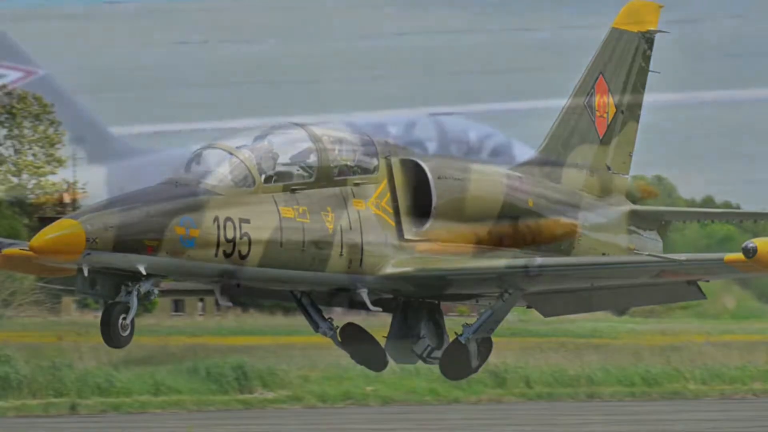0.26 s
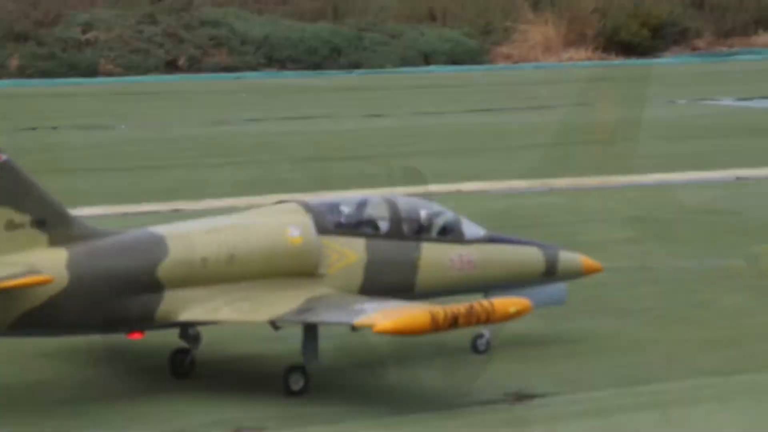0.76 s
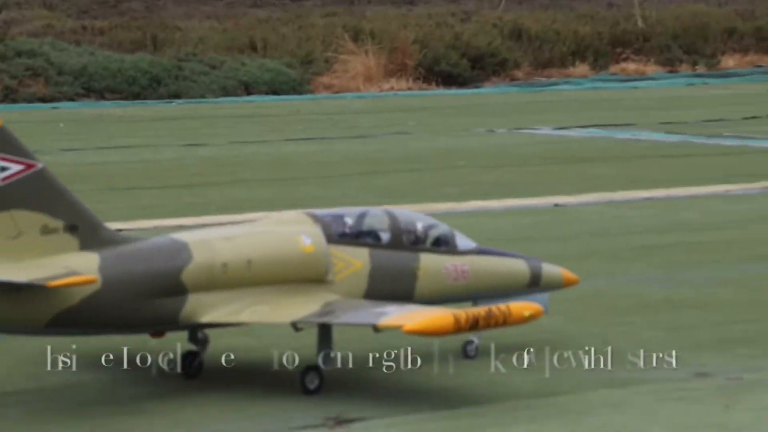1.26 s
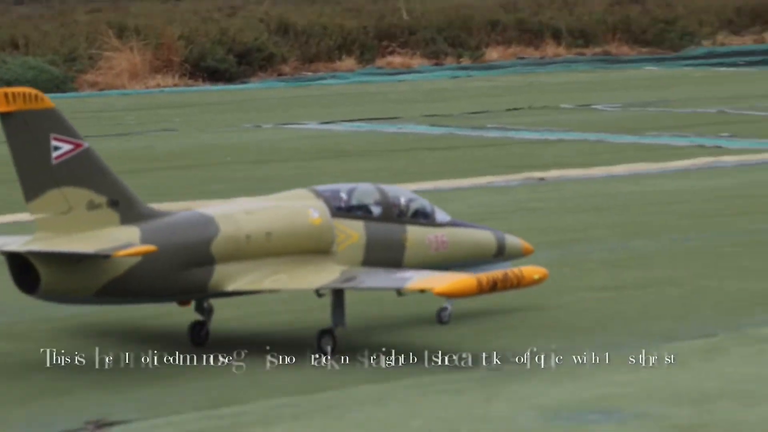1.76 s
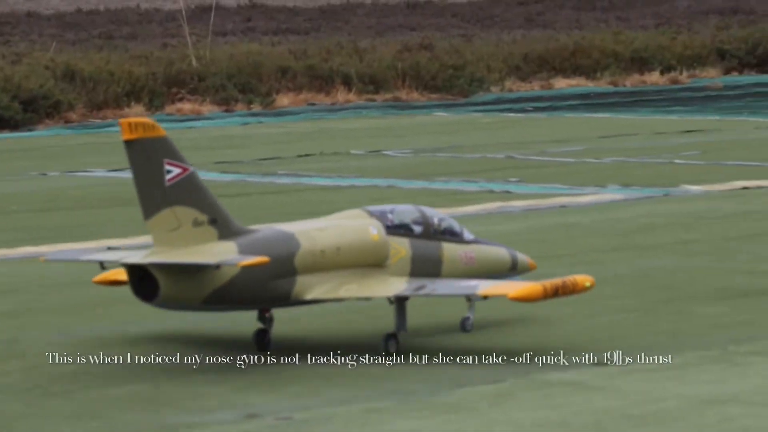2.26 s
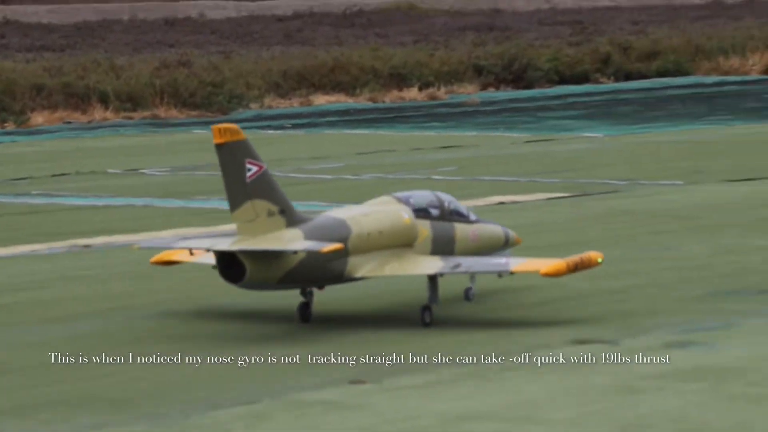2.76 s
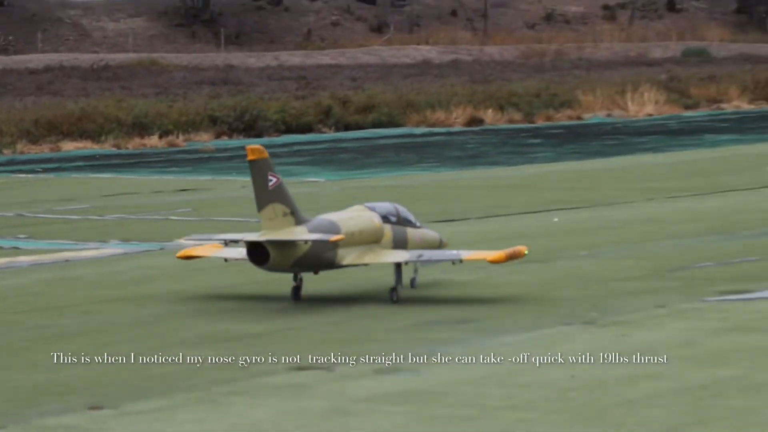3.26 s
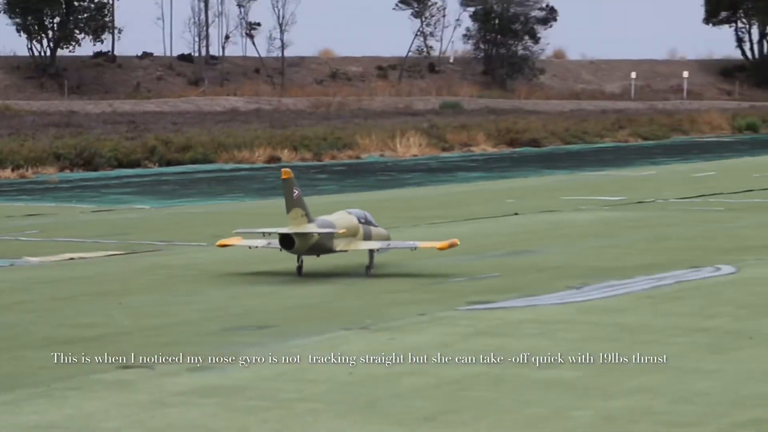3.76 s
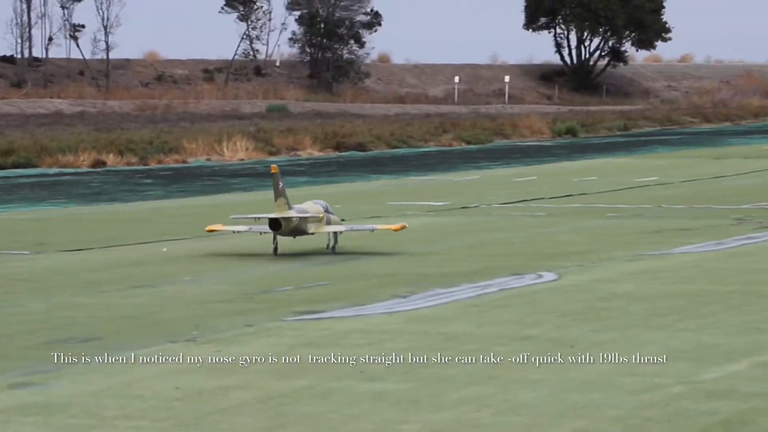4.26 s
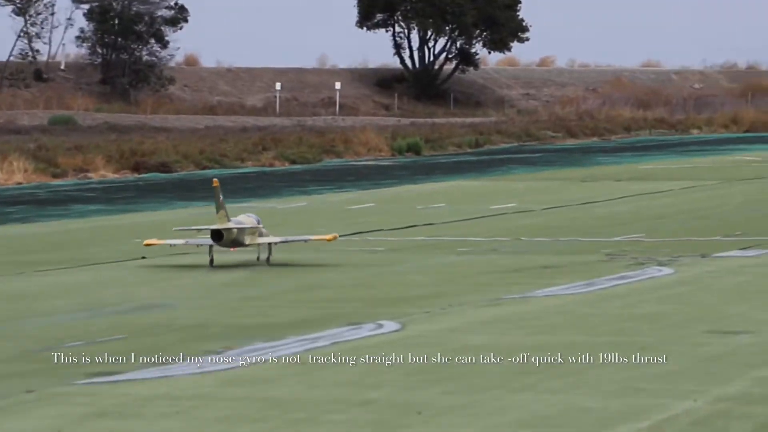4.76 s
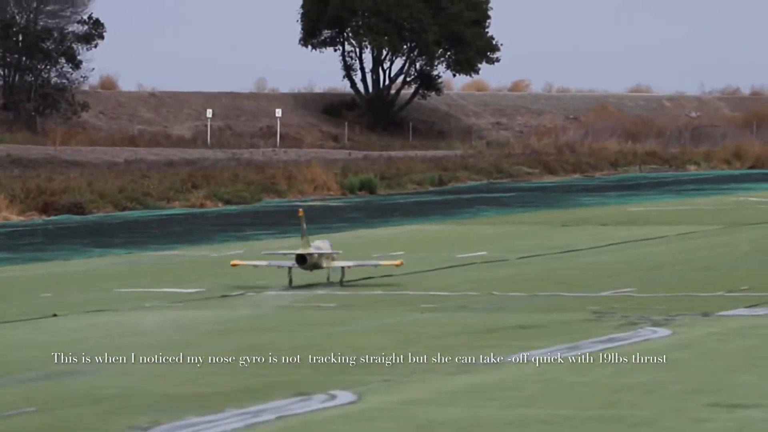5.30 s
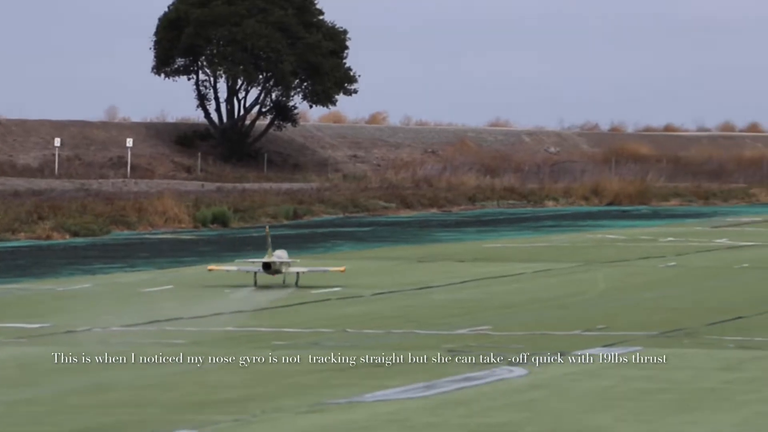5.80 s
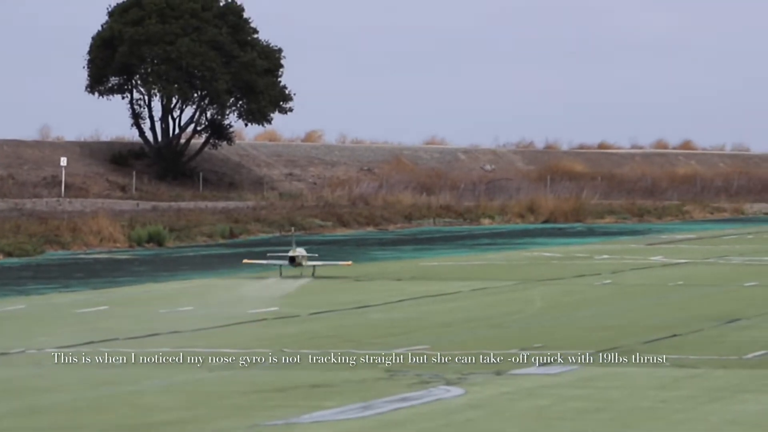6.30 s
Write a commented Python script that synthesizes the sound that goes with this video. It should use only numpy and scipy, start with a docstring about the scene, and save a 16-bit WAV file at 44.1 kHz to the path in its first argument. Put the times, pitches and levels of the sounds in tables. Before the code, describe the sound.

A close electric fan jet fades up as bright hiss with a wavering whine and dull roar. It edges higher, then spools hard into a shrill take-off rush before dropping away into distance. Ground and slope echoes give the noise a hollow, comb-like colour. Soft wind rumble and handling bumps are heard at the hand-held stereo microphone, with wind more exposed at the end.

```python
"""On a grass airstrip, an electric ducted fan spools up in steps on a model jet that rolls away.
Blade tones and a shaft hum are wavering sine waves that follow the fan speed.
Duct hiss, jet roar and wind are random noise, shaped in pitch and loudness moment by moment.
Echoes off the ground and a far slope cut notches into hiss and roar. The pitch sags as the jet leaves.
The hand-held camera adds short knocks; a faint drone sits mostly on the left."""
import sys
import numpy as np
from scipy import signal
from scipy.io import wavfile
from scipy.ndimage import uniform_filter1d

SR = 44100
rng = np.random.default_rng(int(sys.argv[2]) if len(sys.argv) > 2 else 0)


def to_wav(sig):
    """Store sig (one row per channel, or 1-D mono) as 16-bit WAV at the path in sys.argv[1].

    Samples outside -1..1 are clipped; the rate is SR.
    """
    pcm = np.clip(np.atleast_2d(sig), -1, 1) * 32767
    pcm = np.round(pcm).astype(np.int16)
    wavfile.write(sys.argv[1], SR, pcm.T)  # frames by channels


N = 288358

EDGE_HZ = 15830  # upper limit of the whole sound
FULL_POWER_S = 4.889  # the take-off run begins
# Noise is built in short overlapping frames; the long ones resolve low pitches better.
FRAME_SAMPLES, HOP_SAMPLES = 512, 128
FRAMES = N // HOP_SAMPLES + 5
FRAME_HZ = np.fft.rfftfreq(FRAME_SAMPLES, 1 / SR)[:, None]
FRAME_S = np.arange(FRAMES) * HOP_SAMPLES / SR
LONG_HZ = np.fft.rfftfreq(4 * FRAME_SAMPLES, 1 / SR)[:, None]
LONG_S = np.arange(FRAMES // 4 + 5) * 4 * HOP_SAMPLES / SR


def gain_of(db):
    """Turns decibels into an amplitude factor."""
    return 10 ** (np.asarray(db) / 20)


def evened(x, axis=None):
    """Scales a signal to an rms (average strength) of 1."""
    power = np.mean(abs(x) ** 2, axis=axis, keepdims=True)
    return x / np.sqrt(power + 1e-20)


def read_spectrum(points, hz):
    """Reads a table between its points, on a logarithmic frequency axis."""
    table_hz, value = np.transpose(points)
    return np.interp(np.log(hz + 1e-3), np.log(table_hz + 1e-3), value)


def curves(rows, t):
    """Reads every column of a time table at the times t."""
    start_s, *columns = np.transpose(rows)
    return [np.interp(t, start_s, column) for column in columns]


def bumps(rows, t):
    """Adds up bell-shaped swells."""
    return sum(height * np.exp(-((t - centre_s) / half_s) ** 2) for centre_s, half_s, height in rows)


def wander(t, low_hz, high_hz):
    """Adds slow sine waves with random starts into an irregular drift of rms 1."""
    rates_hz = np.geomspace(low_hz, high_hz, num=24)
    waves = (np.sin(2 * np.pi * (f * t + rng.random())) / np.sqrt(f) for f in rates_hz)
    return evened(sum(waves))


# Throttle steps: start_s, goal_hz (blade rate the fan heads for), spool_s (time constant)
THROTTLE_STEPS = [(.068, 2500, .025), (.16, 2815, .055), (.408, 2853, .013), (1.857, 3140, .036),
                  (2.311, 3302, .128), (2.765, 3338, .03), (3.208, 3450, .277), (3.696, 4726, .415),
                  (4.01, 4467, .124), (4.235, 4665, .041), (4.335, 5050, .13), (4.586, 5374, .055),
                  (4.72, 5640, .045), (4.829, 6009, .021)]


def blade_hz(t):
    """The fan lags behind each throttle step; as the jet speeds away its pitch sags."""
    hz = np.full(len(t), 2200.0)  # blade rate before the first step
    for start_s, goal_hz, spool_s in THROTTLE_STEPS:
        start_hz = np.interp(start_s, t, hz)
        lag = np.exp(-np.maximum(t - start_s, 0) / spool_s)
        hz = np.where(t < start_s, hz, goal_hz + (start_hz - goal_hz) * lag)
    accel_m_per_s2, sound_m_per_s = 7.29, 343
    jet_m_per_s = accel_m_per_s2 * np.maximum(t - FULL_POWER_S, 0)
    return hz * (1 - jet_m_per_s / sound_m_per_s)


def speeding(t):
    """How hard the blade rate climbs over a quarter second, 0 to 1."""
    climb_hz_per_s = (blade_hz(t + .125) - blade_hz(t - .125)) / .25
    return np.clip(climb_hz_per_s / 2500, 0, 1)


# How much louder the left port is: pitch_hz, difference_db
LEFT_LOUDER = [(30, 10), (70, 0), (130, 0.5), (260, 0.5), (550, 2.5), (900, 3), (1500, 0), (2400, 0),
               (3400, 0), (5000, 0), (7200, 1), (8500, 1.5), (10400, 13), (12500, 8), (15000, -6)]
# How far the left port leads in phase: pitch_hz, lead_radians
LEFT_LEADS = [(0, 0.37), (1550, -0.47), (1980, 0.92), (2840, -0.35), (6890, 0.87), (7490, -0.42),
              (9220, 1.5), (10200, 1.4), (11500, -1), (15800, 0.35)]


def ports(hz):
    """The two microphone ports differ in loudness and phase; each takes half the difference."""
    loudness = gain_of(read_spectrum(LEFT_LOUDER, hz) / 2)
    left = loudness * np.exp(.5j * read_spectrum(LEFT_LEADS, hz))
    return left, 1 / left


def noise(shape, level_db, hz, same, patchy_db, flicker_db):
    """Random two-port noise takes a shape in pitch, with drifting patches and a flickering level."""
    bins, frames = shape.shape
    a, b, c, d, patches = rng.standard_normal((frames, bins, 5)).T
    patches = uniform_filter1d(patches, size=8, axis=0)
    patches = evened(uniform_filter1d(patches, size=24, axis=1))
    flicker = evened(uniform_filter1d(rng.standard_normal(frames), size=10))
    shared = np.sqrt((1 + same) / 2) * (a + 1j * b)
    apart = np.sqrt((1 - same) / 2) * (c + 1j * d)
    left, right = ports(hz)
    spectrum = np.array([left * (shared + apart), right * (shared - apart)]) * evened(shape, axis=0)
    size = 2 * (bins - 1)
    spectrum *= gain_of(patchy_db * patches + flicker_db * flicker + level_db) / np.sqrt(size)
    return signal.istft(spectrum, nperseg=size, noverlap=size - size // 4)[1][:, :N]


# How well the ground reflects, before each sound's own share: pitch_hz, strength (0-1)
GROUND_STRENGTH = [(500, 0.35), (1800, 1), (3500, 1), (5500, 0.52), (9500, 0.16), (14000, 0.078)]


def ground(hz, notch_hz, share):
    """Direct sound and ground echo add up; odd multiples of the first notch weaken."""
    echo = np.clip(share * read_spectrum(GROUND_STRENGTH, hz), 0, .95)
    return abs(1 + echo * np.exp(1j * np.pi * hz / notch_hz))


# Echo off the far slope: start_s, delay_ms, share (of the direct sound)
SLOPE_ECHO = [(0, 4.5, 0.36), (3.8, 2.63, 0), (4.8, 3.7, 0.5), (5.8, 2.95, 0), (6.54, 4.9, 0.044)]


def slope(hz, t):
    """A later echo from the far slope combs the sound finely."""
    delay_ms, share = curves(SLOPE_ECHO, t)
    return abs(1 + np.clip(share, 0, .9) * np.exp(2j * np.pi * hz * delay_ms / 1000))


# How alike hiss and roar are in the two ports: pitch_hz, likeness (0-1)
PORT_LIKENESS = [(60, 0.98), (130, .75), (250, 0.96), (500, 0.99), (900, 1), (1400, 0.74), (2000, 0.87),
                 (2800, 0.99), (4200, 1), (6400, 1), (7600, 0.87), (9800, 0.92), (15000, 0.63)]
# Hiss over time: start_s, level_db, tilt_db_per_octave (flattens out at low pitch)
HISS_LEVEL = [(0, -17.5, 2), (1.8, -16.5, 2.5), (2.5, -15.5, 0.5), (3.2, -17, 2.5), (3.6, -19, 3),
              (3.8, -16, 3.5), (4.1, -17, -.5), (4.43, -18, 1), (4.8, -16.5, -1.5), (5.5, -20, 1),
              (5.68, -26, -1), (6, -27.5, -2.5), (6.25, -31.5, -6.5), (6.54, -32, -7.5)]
# The duct lets little hiss out below the blade rate: multiple (of the blade rate), colour_db
HISS_CUT_ON = [(.3, -23), (.6, -18), (.75, -12), (.9, -4.5), (1, -1), (1.5, -1), (1.9, -2.5), (2.1, -2.5),
               (3, -2), (5, -1.5)]
# Fixed colour of the hiss: pitch_hz, colour_db
HISS_COLOUR = [(2000, 4.5), (4000, -4), (5500, -2), (7000, 2), (9000, -0.5), (11000, -6), (13000, -5),
               (15000, -15), (16000, -32)]
# Humps: multiple (of the blade rate), half_width (in multiples), hump_db, more_db (at fullest climb)
HISS_HUMPS = [(1.03, .2, 4.5, -1.5), (1.54, .04, 1.5, 0.5), (2.03, .2, 3.5, 3)]
# A beam from the tail pipe sweeps past as the jet turns: start_s, pitch_hz, beam_db, shadow_db
TAIL_BEAM = [(0, 7260, 1.5, 0), (1.6, 7550, 0, 0.5), (2.2, 7760, 0.5, -4), (2.7, 10100, 8.5, -3),
             (3.12, 10700, 3.5, -5.5), (3.4, 12900, -4, -3), (3.8, 13200, -10, 1)]
# First ground notch of the hiss: start_s, pitch_hz
HISS_NOTCH = [(0, 1740), (1.8, 1690), (3, 2200), (3.9, 2000), (4.6, 2140), (6.54, 2260)]


def hiss():
    """Turbulent air on the blades hisses from the blade rate upward, with humps near its multiples."""
    t, hz = FRAME_S, FRAME_HZ
    level_db, tilt = curves(HISS_LEVEL, t)
    (notch_hz,) = curves(HISS_NOTCH, t)
    beam_hz, beam_db, shadow_db = curves(TAIL_BEAM, t)
    multiple = hz / blade_hz(t)
    shape_db = read_spectrum(HISS_CUT_ON, multiple) + read_spectrum(HISS_COLOUR, hz)
    shape_db += tilt * np.log2(hz / 6000 + 0.12)
    # A band near the top grows by 10 dB for each doubling of the blade rate.
    shape_db += 10 * np.log2(blade_hz(t) / 3500) * np.exp(-((hz - 13300) / 1300) ** 2)
    for centre, half_width, hump_db, more_db in HISS_HUMPS:
        hump = np.exp(-((multiple - centre) / half_width) ** 2)
        shape_db = shape_db + (hump_db + more_db * speeding(t)) * hump
    shape_db += beam_db * np.exp(-((hz - beam_hz) / 1100) ** 2)
    # The shadow lies just below the beam.
    shape_db += shadow_db * np.exp(-((hz - .76 * beam_hz) / 900) ** 2)
    shape = gain_of(shape_db) * ground(hz, notch_hz, 0.58) * slope(hz, t) ** .4  # softened comb
    same = np.clip(read_spectrum(PORT_LIKENESS, hz), 0, 1)
    return noise(shape, level_db, hz, same, patchy_db=0.66, flicker_db=0.56)


# Roar over time: start_s, level_db, behind (weight of the tail-on colour; the side colour gets 1.5 minus it), #
# share (of the ground echo that stays in step, 0-1)
ROAR_LEVEL = [(0, -24.5, 0.6, 0.61), (.7, -23, -0.23, 0.86), (1.5, -23.5, 0.028, 0.89),
              (3.55, -22.5, 0.44, 0.59), (4.3, -19, 0.56, 0.36), (4.9, -18.5, 0.86, 0.6),
              (5.5, -20, 1.07, 0.53), (6.54, -26, 1.84, 0.45)]
# Roar colour from the side: pitch_hz, colour_db_per_hz
ROAR_SIDE_COLOUR = [(50, -38), (90, -16), (150, -8), (210, -9.5), (320, -3.5), (480, -7.5), (700, -6),
                    (1050, -7), (1450, -7.5), (2200, -13), (3200, -20.5), (5000, -14), (9000, -88)]
# Roar colour from behind: pitch_hz, colour_db_per_hz
ROAR_BEHIND_COLOUR = [(50, -40), (90, -20), (150, -16), (210, -6), (320, -3.5), (480, -6), (750, -11),
                      (1250, -9), (1600, -11.5), (2200, -16), (3200, -23), (5000, -25), (9000, -60)]


def roar():
    """The jet mixes with still air and roars; its colour shifts as the tail pipe turns to the camera."""
    hz, t = LONG_HZ, LONG_S
    level_db, behind, share = curves(ROAR_LEVEL, t)
    slope_amount = np.clip(hz / 1800, 0, 1)  # the slope echo fades out at low pitch
    echoes = ground(hz, 1738, share) * slope(hz, t) ** slope_amount
    colour_db = (1.5 - behind) * read_spectrum(ROAR_SIDE_COLOUR, hz)
    colour_db = colour_db + behind * read_spectrum(ROAR_BEHIND_COLOUR, hz)
    same = np.clip(read_spectrum(PORT_LIKENESS, hz), 0, 1)
    return noise(gain_of(colour_db) * echoes, level_db, hz, same, patchy_db=.6, flicker_db=.3)


# Blade tones: start_s, then level_db of multiples 1, 2 and 3 of the blade rate
BLADE_TONES = [(0, -38, -40, -45), (.1, -32, -35, -45), (.19, -41, -50, -45), (.29, -32, -46, -29),
               (.55, -29, -33, -29), (1.22, -26, -40, -31), (1.8, -36, -35, -31), (1.92, -23, -38, -39),
               (2.25, -24, -36, -33), (2.5, -30, -36, -33), (2.63, -26, -32, -34), (2.85, -32, -30, -38),
               (3.05, -34, -39, -33), (3.6, -44, -42, -42), (3.73, -33, -30, -42), (3.87, -35, -29, -45),
               (4, -26, -28, -52), (4.25, -24, -25, -56), (4.31, -33, -33, -60), (4.4, -36, -30, -66),
               (4.55, -31, -31, -70), (4.71, -39, -38, -70), (4.755, -22, -33, -70), (4.828, -22, -34, -70),
               (4.85, -40, -40, -70), (4.89, -24, -39, -70), (5.2, -24, -31, -70), (5.5, -27, -34, -70),
               (5.66, -33, -47, -70), (6.08, -35, -53, -70), (6.16, -45, -55, -70), (6.54, -50, -60, -70)]
# Swells of the shaft hum: centre_s, half_length_s, level_db
HUM_SWELLS = [(1.1, 0.66, -41.5), (4.85, 0.82, -38)]


def whine():
    """Blades and shaft sing; uneven inflow blurs the blade tones, more during climbs and far away."""
    t = np.arange(N) / SR
    hz = uniform_filter1d(blade_hz(t), size=400) + 4 * wander(t, 4, 30)  # 4 Hz rms unsteadiness
    blade_turns = np.cumsum(hz) / SR  # blade passings so far
    blade_count = 11
    hum_level = bumps([(centre_s, half_s, gain_of(db)) for centre_s, half_s, db in HUM_SWELLS], t)
    hum = hum_level * np.sin(2 * np.pi * blade_turns / blade_count)
    out = np.sqrt(2) * np.array([hum, hum])
    for k, level_db in enumerate(curves(BLADE_TONES, t)):
        multiple = k + 1
        chance = rng.standard_normal((N, 2))
        chance = uniform_filter1d(chance, size=300 // multiple, axis=0)
        a, b = uniform_filter1d(chance, size=240 // multiple, axis=0).T
        far = np.maximum(t - FULL_POWER_S, 0)
        blur = .28 + .08 * k + .35 * min(k, 1) * speeding(t) + .3 * far
        blur = np.minimum(blur, .9)
        steady = np.sqrt(1 - blur ** 2) * gain_of(1.43 * wander(t, 3, 50))
        inflow = steady + blur * evened(a + 1j * b)
        audible = multiple * hz < EDGE_HZ
        tone = audible * gain_of(level_db) * inflow * np.exp(2j * np.pi * multiple * blade_turns)
        out += np.sqrt(2) * (np.array(ports(multiple * hz)) * tone).imag
    return out


# Colour of the wind: pitch_hz, colour_db_per_hz
WIND_COLOUR = [(20, -19), (40, 7.5), (65, 2), (100, -4.5), (200, -19), (400, -50)]
# Gusts: centre_s, half_length_s, rise_db (above calm)
WIND_GUSTS = [(1.4, 0.54, 9), (2.8, .15, 6.5), (5.5, 0.079, 9), (6.5, 0.97, 14.5)]


def wind():
    """Air buffets the microphone ports as low, lumpy noise that swells in gusts."""
    calm_db = -49
    level_db = calm_db + bumps(WIND_GUSTS, LONG_S) + 2.7 * wander(LONG_S, 3.8, 13)
    shape = gain_of(read_spectrum(WIND_COLOUR, LONG_HZ)) + 0 * LONG_S  # same colour in every frame
    return noise(shape, level_db, LONG_HZ, .9, patchy_db=.5, flicker_db=.5)


# Knocks on the camera: start_s, thud_db, casing_db
CAMERA_KNOCKS = [(0.791, -33, -33), (2.505, -33, -21), (4.251, -29, -13)]


def ring(hz, t60_s, rise_s):
    """A struck body rings as a sine that rises, then dies away by 60 dB per t60; its peak is 1."""
    t = np.arange(SR // 5) / SR
    wave = (1 - np.exp(-t / rise_s)) * gain_of(-60 * t / t60_s) * np.sin(2 * np.pi * hz * t)
    return wave / wave.max()


def knocks():
    """Bumps on the camera: a thud in both ports; the casing shakes them against each other."""
    out = np.zeros((2, N))
    thud = np.outer([1.45, .55], ring(hz=64, t60_s=.13, rise_s=0.038))
    casing = np.outer([1, -1], ring(hz=238, t60_s=.05, rise_s=0.0065))
    for start_s, thud_db, casing_db in CAMERA_KNOCKS:
        at = round(start_s * SR)
        out[:, at:at + thud.shape[1]] += gain_of(thud_db) * thud + gain_of(casing_db) * casing
    return out


# Faint drone: start_s, pitch_hz, level_db (before the left-right split)
DRONE_TONE = [(2.8, 412, -70), (3.2, 412, -46), (4.4, 406, -46), (4.9, 403, -70)]


def drone():
    """A faint sine tone swells and fades, mostly on the left."""
    hz, level_db = curves(DRONE_TONE, np.arange(N) / SR)
    tone = gain_of(level_db) * np.sin(2 * np.pi * np.cumsum(hz) / SR)
    return np.array([[1.3], [-.3]]) * tone


def scene():
    """Adds all sources at the camera; everything swells in at the start."""
    swell_db, swell_s = -23.5, 0.24  # start level, time constant
    swell = gain_of(swell_db * np.exp(-np.arange(N) / SR / swell_s))
    return swell * (hiss() + roar() + whine() + wind() + drone() + knocks())


def record(dry):
    """A steep low-pass filter removes what lies above the upper limit."""
    low_pass = signal.firwin(511, EDGE_HZ, window=("kaiser", 9), fs=SR)
    return signal.oaconvolve(dry, low_pass[None], "same")


dry = scene()
out = record(dry)
to_wav(out)
```